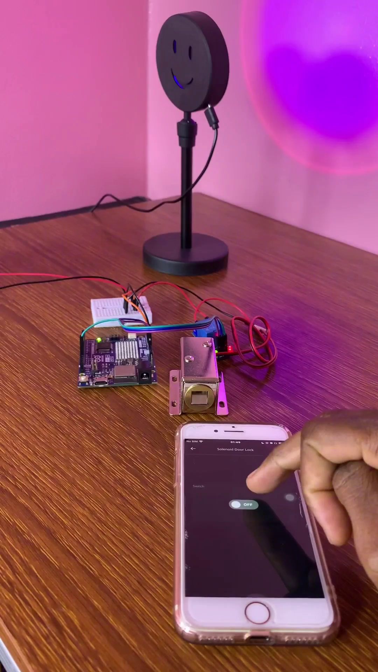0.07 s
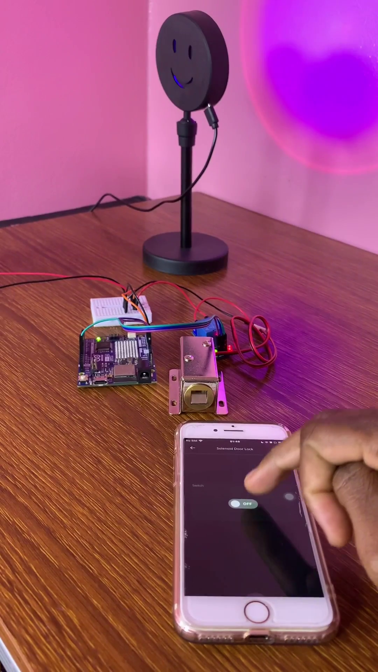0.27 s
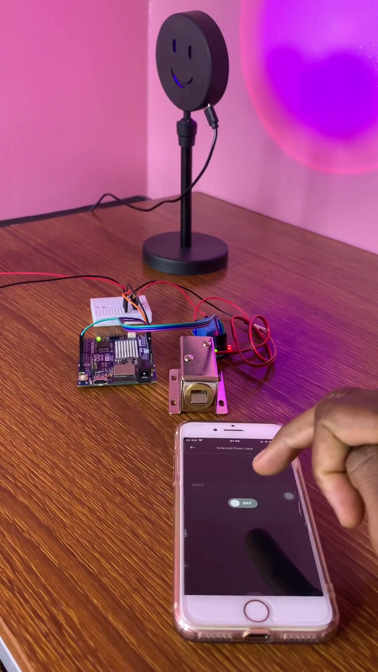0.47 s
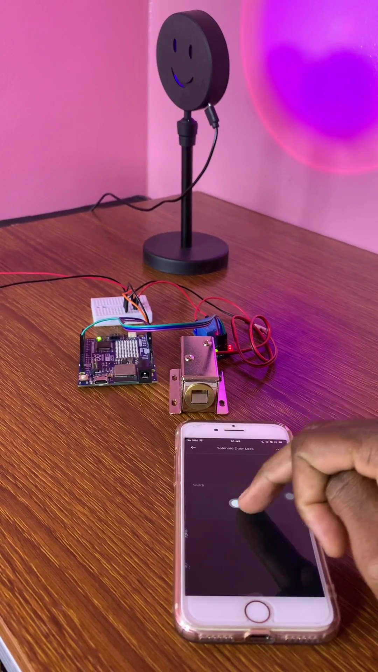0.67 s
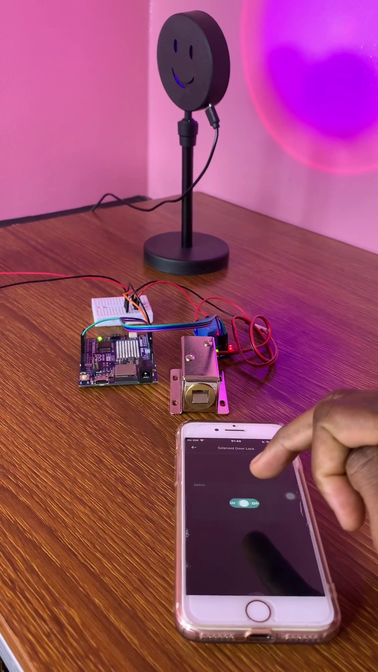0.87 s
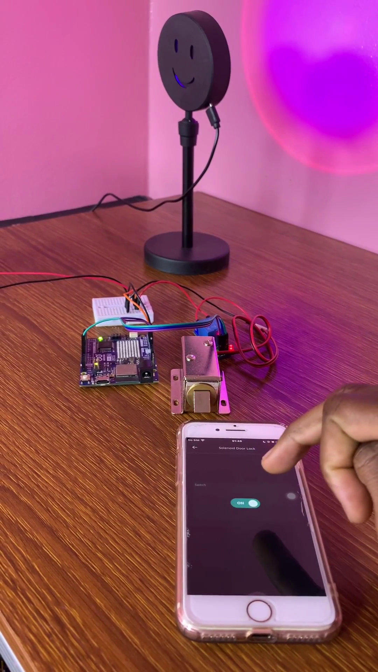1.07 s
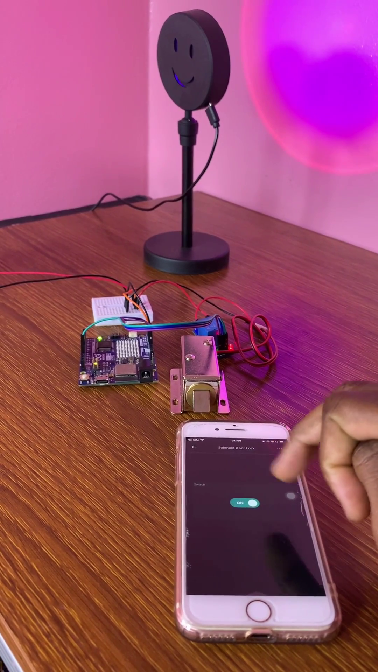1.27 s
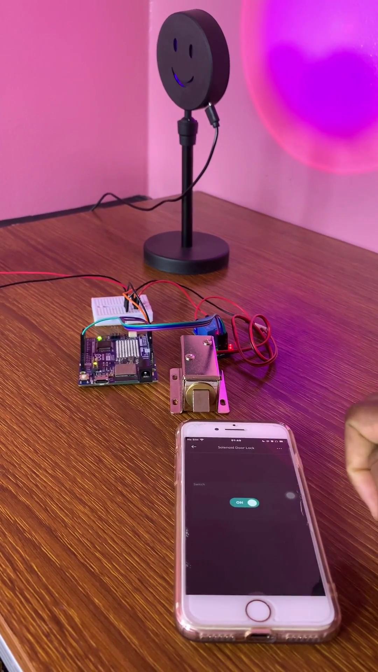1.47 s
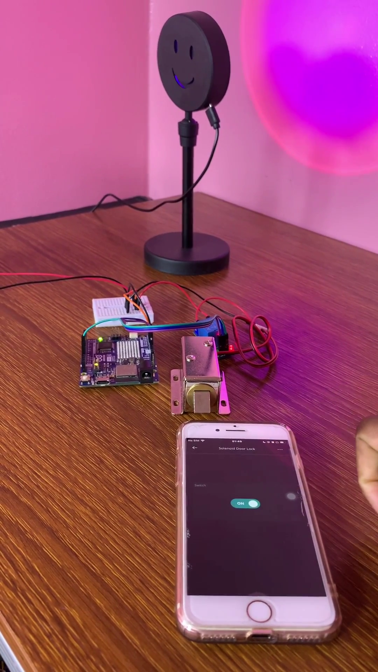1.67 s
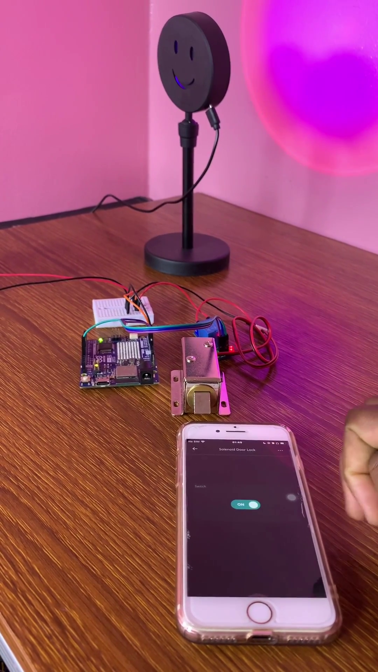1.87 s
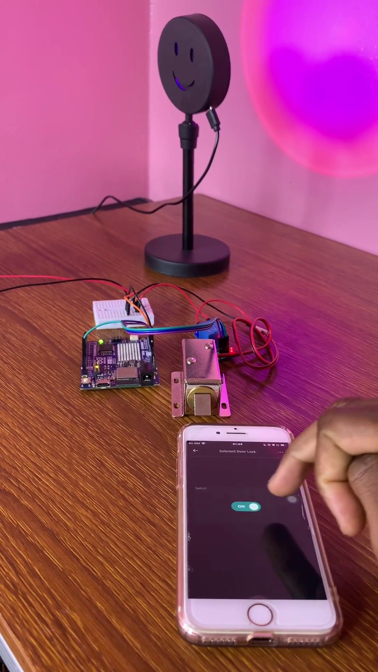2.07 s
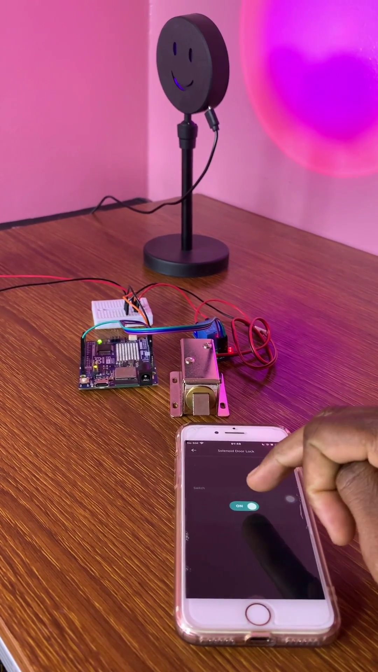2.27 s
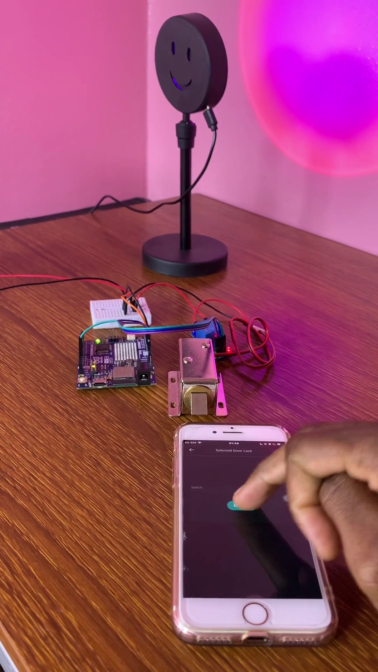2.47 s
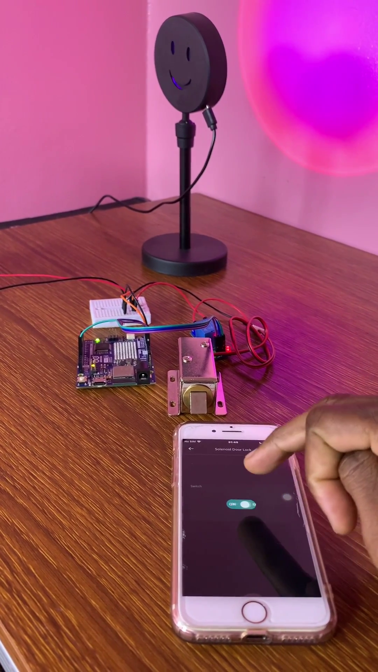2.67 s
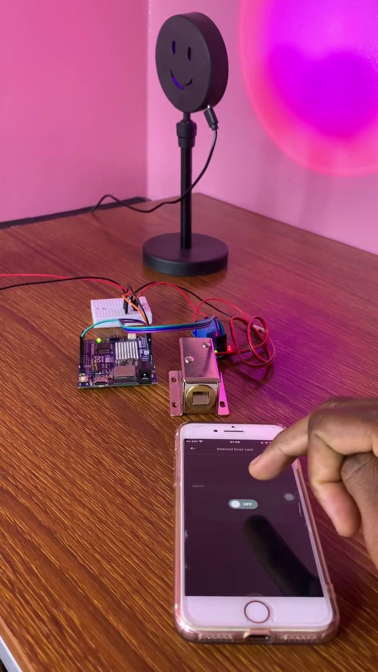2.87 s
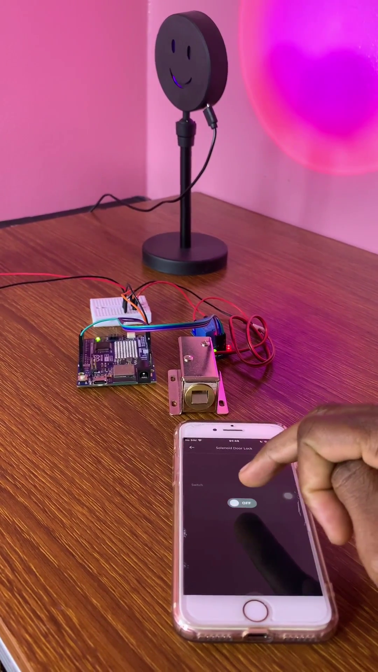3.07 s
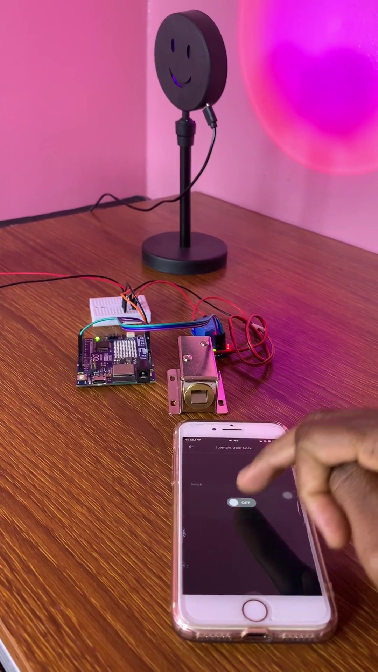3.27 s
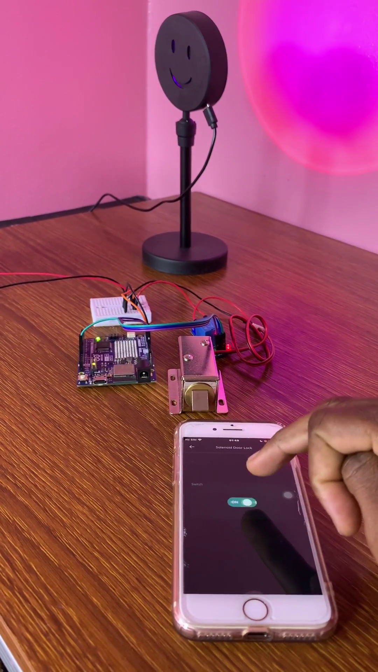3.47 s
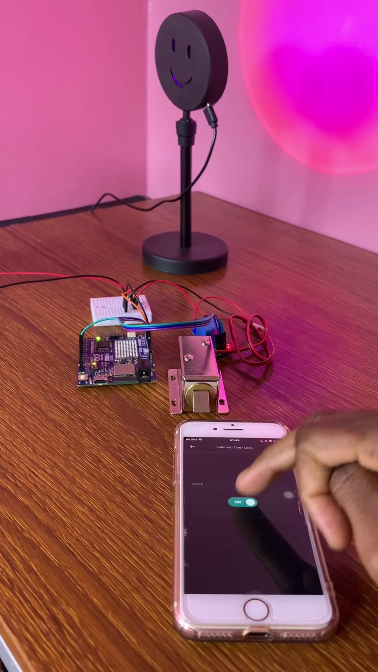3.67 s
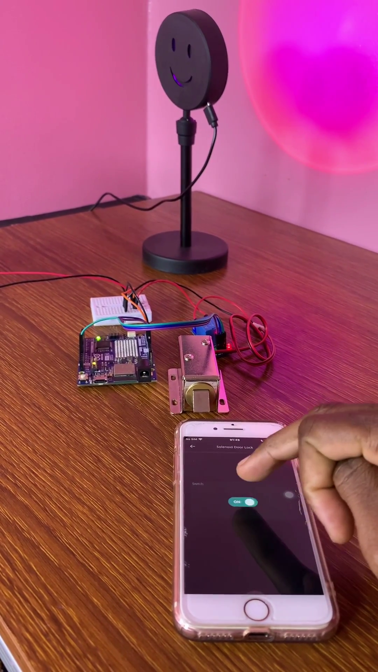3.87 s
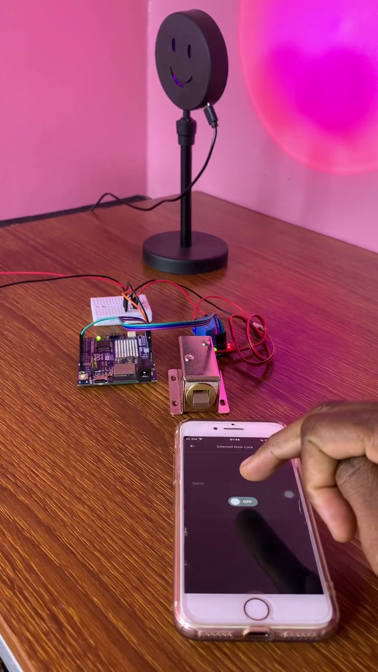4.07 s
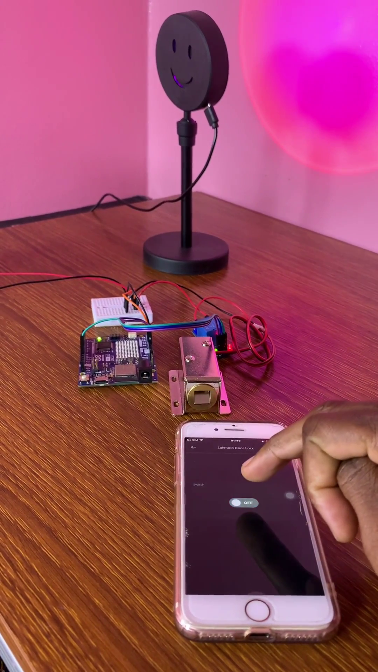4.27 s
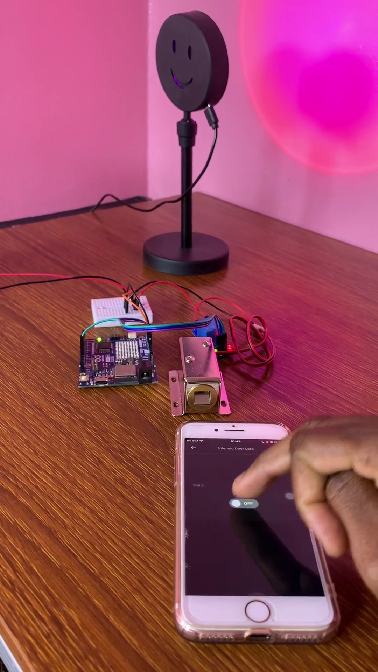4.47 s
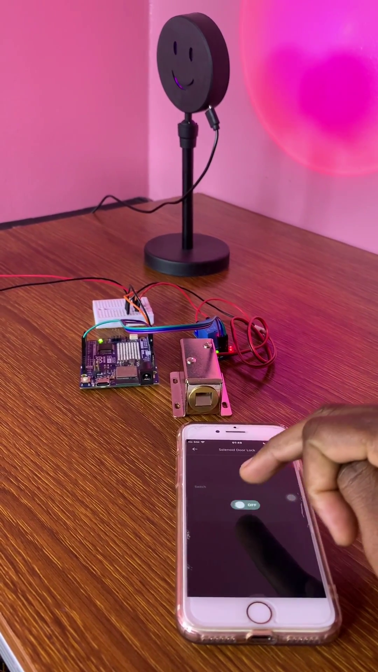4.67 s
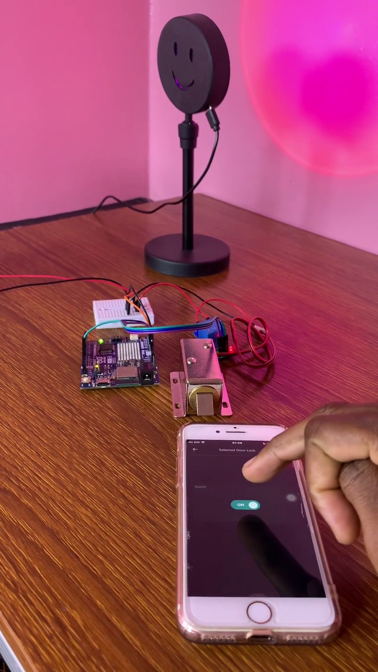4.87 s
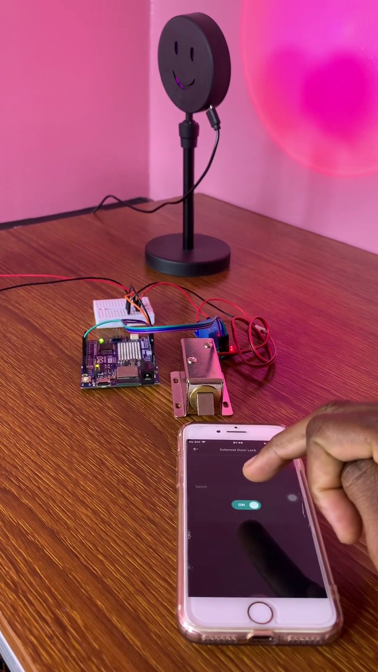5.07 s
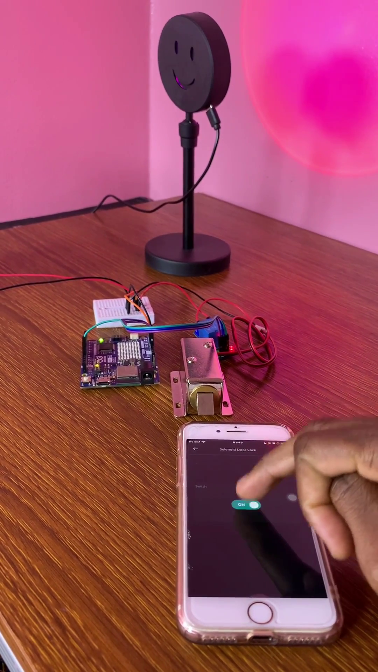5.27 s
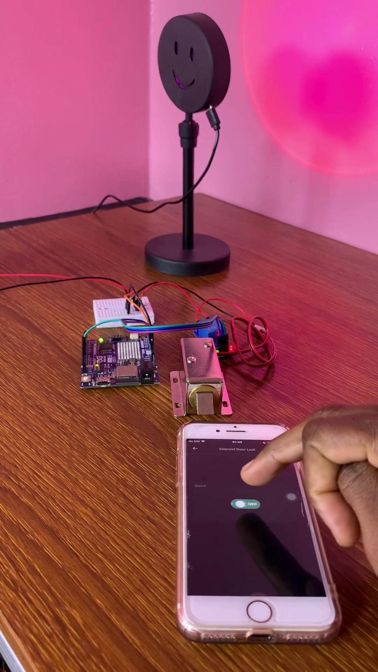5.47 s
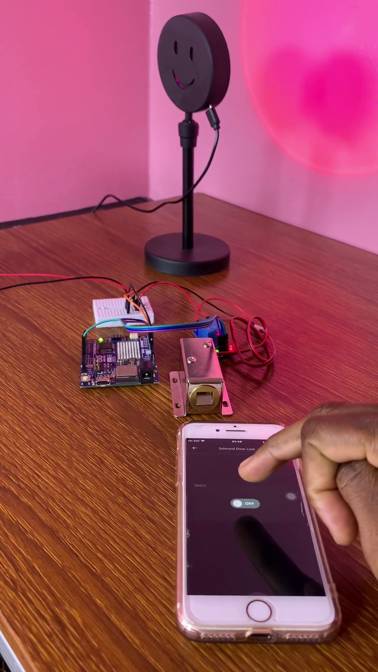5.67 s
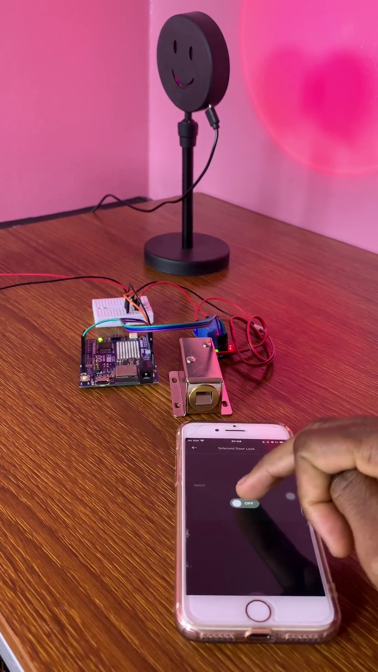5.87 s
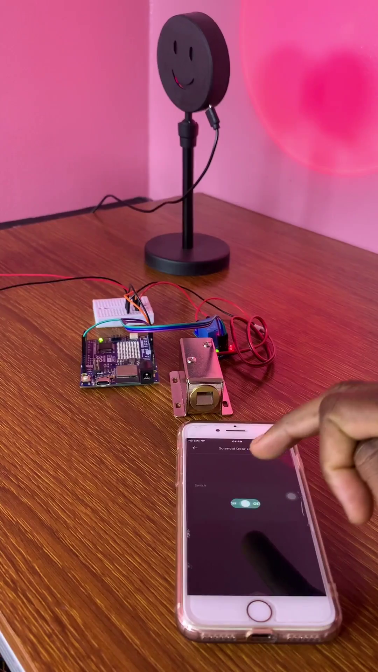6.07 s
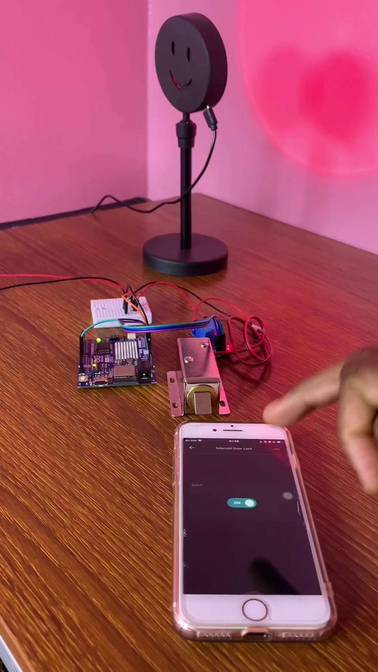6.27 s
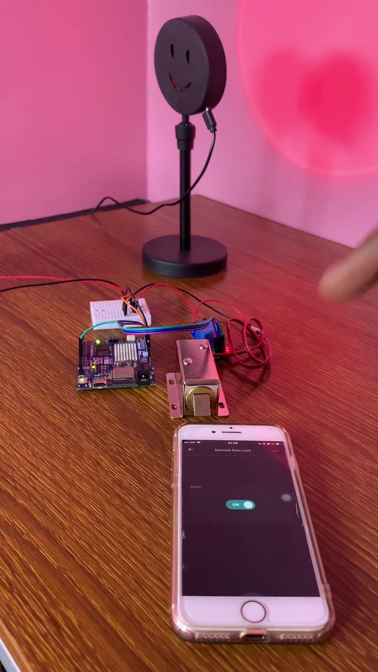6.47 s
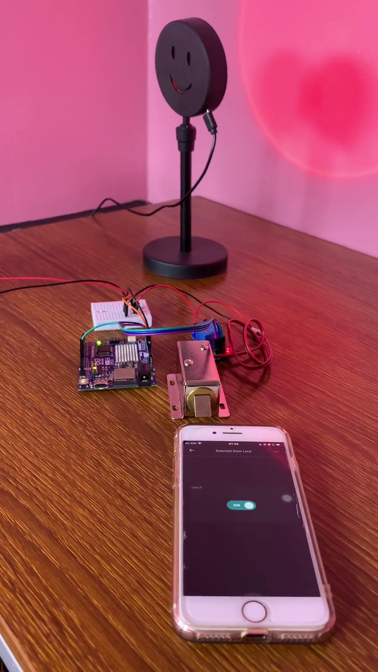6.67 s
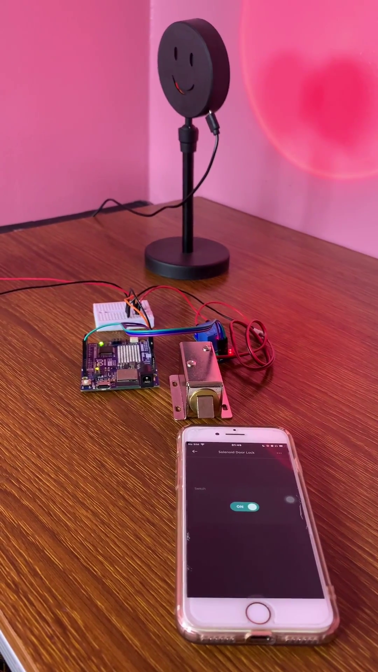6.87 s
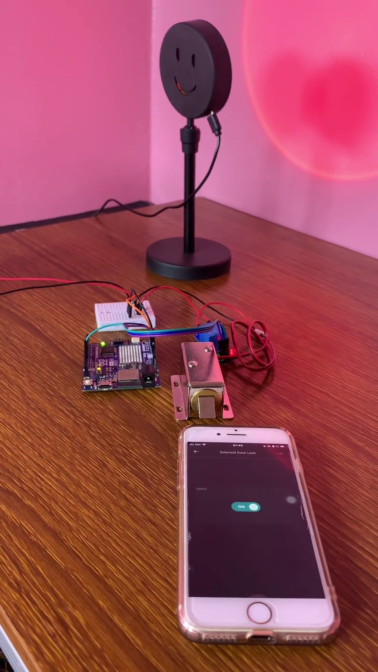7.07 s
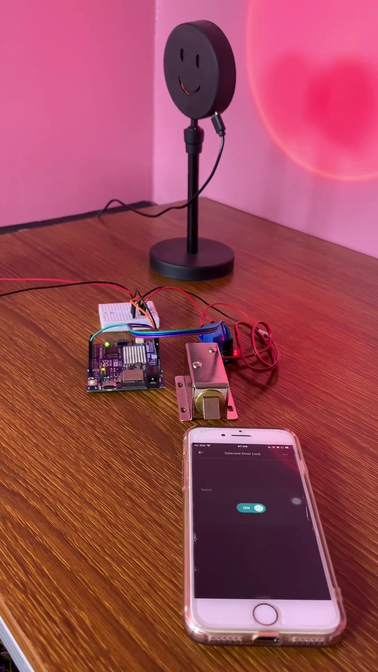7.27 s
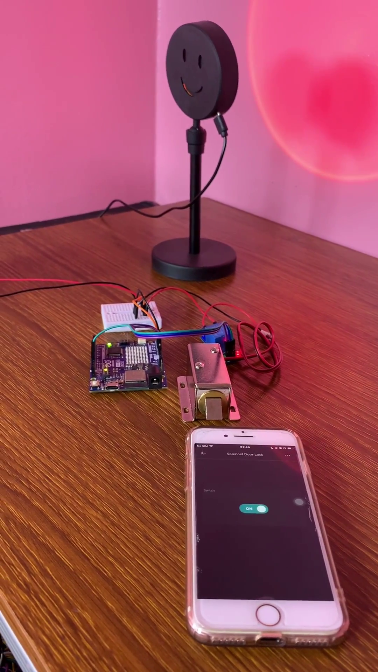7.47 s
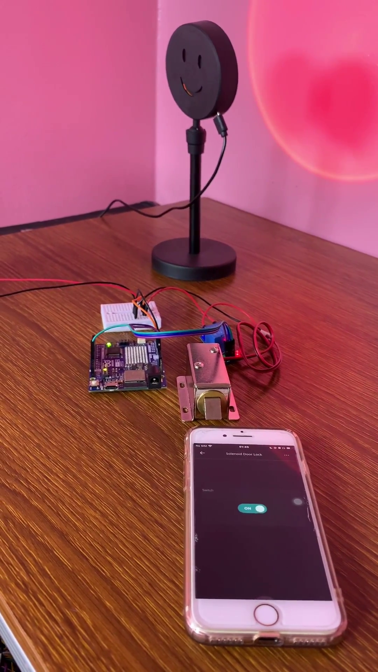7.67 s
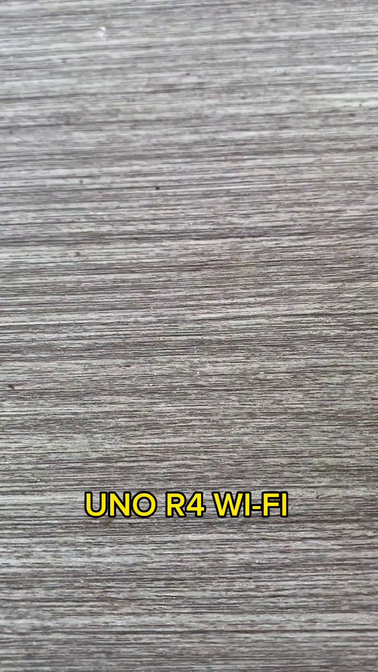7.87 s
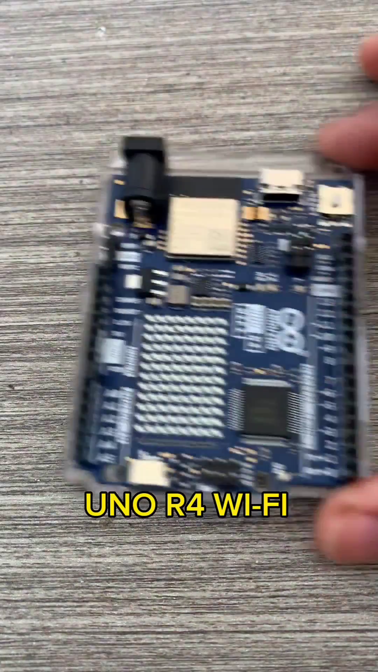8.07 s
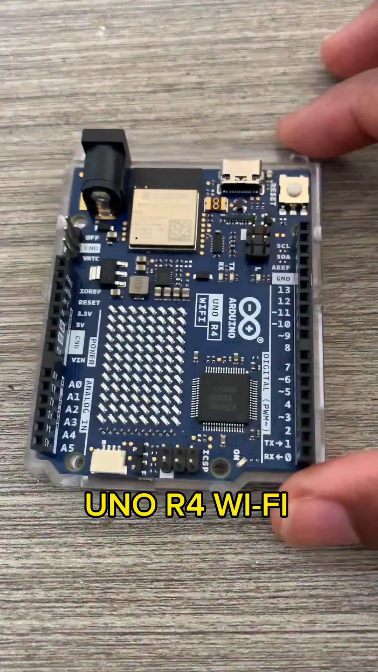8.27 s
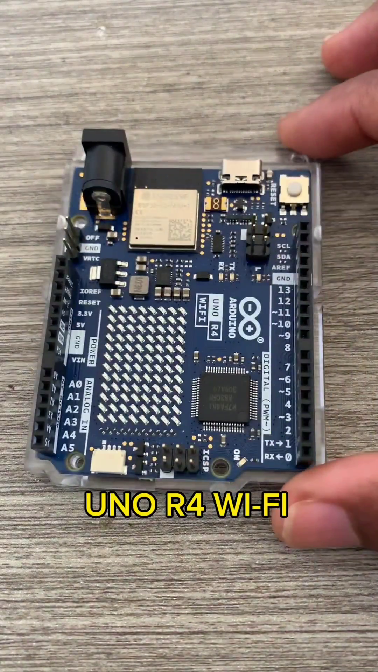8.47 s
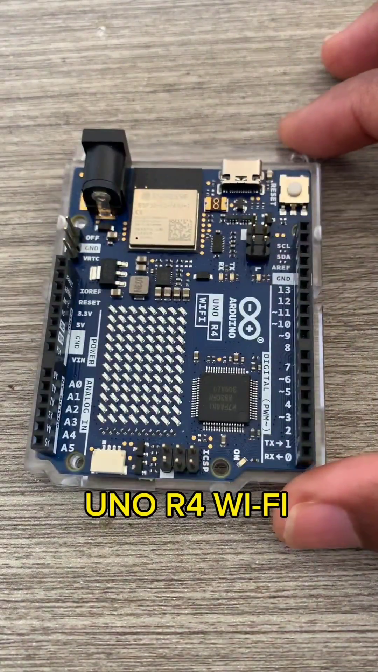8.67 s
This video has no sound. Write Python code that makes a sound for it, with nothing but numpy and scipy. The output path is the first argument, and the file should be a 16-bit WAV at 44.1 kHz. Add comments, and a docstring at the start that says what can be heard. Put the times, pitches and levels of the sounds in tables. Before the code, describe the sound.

Quiet hiss and low hum in a bare, reverberant room, heard close in stereo by a phone. A faint fingertip tap and soft bass thump come at 0.6 s. At 1.0 s a tiny relay tick leads into a loud, sharp metallic plunger slam with a short wooden desk boom and bright room tail. Faint taps follow at 1.8 and 2.5. At 2.75 the relay snaps, the bolt slides briefly and clacks out, its ring swelling slightly before fading. Slam in at 3.46, release at 4.08, slam at 4.79, release at 5.5, last slam at 6.13, decaying into near quiet. Around 7.75 a dull tap; at 7.87 the sound cuts to a dry mono tabletop: ticks, then a rough, hollow plastic tray scrape with woody rasp, strongest near 8.1, gone by about 8.3, with weak friction and thin clicks around 8.45 and 8.63.

```python
"""A solenoid lock on a wooden desk in a bare, ringing room, switched by a relay, close to a phone with two ports.
Pull-in: the relay ticks, the plunger slams home and shakes the desk. Release: the relay snaps, a spring throws
the bolt out. Strikes are enveloped noise and short pushes, coloured by filters, ringing modes and the room.
Behind them: hiss, hum, bass thumps and fingertip taps. At the end, in another place and in mono, a circuit
board in its plastic tray is slid over a table, made of filtered friction noise."""
import sys
import numpy as np
from scipy import signal
from scipy.fft import rfft, irfft
from scipy.io import wavfile
from scipy.ndimage import uniform_filter1d

SR = 44100
rng = np.random.default_rng(int(sys.argv[2]) if len(sys.argv) > 2 else 0)


def wav_out(sig):
    """Save sig, one row per channel (or a flat mono array), as 16-bit PCM at SR to the path in sys.argv[1]."""
    wavfile.write(sys.argv[1], SR, np.round(np.clip(np.atleast_2d(sig).T, -1, 1) * 32767).astype(np.int16))


N = 384463
T = np.arange(N) / SR
SIZE = 2 ** 15 * 13  # FFT length in samples
HZ = np.arange(SIZE // 2 + 1) * SR / SIZE
SECOND_PLACE_S = 7.862  # from here on: the table, in mono


def undb(db):
    """Amplitude factor of a level in dB."""
    return 10 ** (np.asarray(db) / 20)


def unit(x):
    """Scale to an RMS of 1."""
    return x / np.sqrt(np.mean(x ** 2))


def shape(x, gain):
    """Filter by a complex gain over frequency."""
    return irfft(rfft(x, SIZE) * gain, SIZE)[..., :N]


def colour(points):
    """Gain through (f/Hz, level/dB) points, straight on a log frequency axis."""
    hz, db = np.transpose(points)
    return undb(np.interp(np.log(HZ + 1), np.log(hz), db))


def bell(centre_hz, width_hz):
    """Gain with one rounded peak."""
    return 1 / (1 + ((HZ - centre_hz) / width_hz) ** 2)


def walk(size):
    """Slow random drift of RMS 1: noise averaged twice over size samples."""
    once = uniform_filter1d(rng.standard_normal(N), size=size)
    return unit(uniform_filter1d(once, size=size))


def grit(scatter_db):
    """Noise of micro-impacts with uneven sizes."""
    sizes = undb(scatter_db * rng.standard_normal(N))
    return unit(rng.standard_normal(N) * sizes)


def modes(table):
    """Summed response of decaying sines of alternating sign; each takes a cycle or two to build up."""
    t = np.arange(SR // 4) / SR
    ringing = np.zeros(len(t))
    for k, (hz, db, t60) in enumerate(table):
        build_up = 1 - np.exp(-t * hz / 1.7)
        ringing += (-1) ** k * undb(db - 60 * t / t60) * np.sin(2 * np.pi * hz * t) * build_up
    return rfft(ringing, SIZE)


def force(times, levels_db, contacts):
    """Envelope of contact force: every stroke plays the same short series of touches."""
    out, t = np.zeros(N), np.arange(SR // 10) / SR
    for s, db in zip(times, levels_db):
        for offset, part_db, rise, fall in contacts:
            i = int((s + offset) * SR)
            touch = np.minimum(t / rise, 1) ** 2 * np.exp(-np.maximum(t - rise, 0) / fall)
            out[i:i + len(t)] += undb(db + part_db) * touch
    return out


def knock(times, levels_db, push_s):
    """Short smooth pushes, each of unit area times its level."""
    out = np.zeros(N)
    out[(np.array(times) * SR).astype(int)] = undb(levels_db)
    t = np.arange(400) / SR
    push = t * np.exp(-t / push_s)
    return signal.fftconvolve(out, push / push.sum())[:N]


def ticks(table, low_hz, high_hz, fall_s):
    """Short bursts of band noise with the peak level of each row."""
    out, t = np.zeros(N), np.arange(1500) / SR
    band = signal.butter(3, [low_hz, high_hz], "band", fs=SR)
    for (s, db), noise in zip(table, rng.standard_normal((len(table), 1500))):
        tick = signal.lfilter(*band, noise * np.exp(-t / fall_s))
        out[int(s * SR):int(s * SR) + 1500] += undb(db) * tick / np.max(np.abs(tick))
    return out


# dull thumps in the bass as the hand presses and the lock strikes: t/s, level/dB
THUMP_TIMES = [(.645, -43), (1.02, -43.5), (2.1, -56), (2.479, -43.5), (2.76, -47.5), (2.97, -49.5),
               (3.2, -42.5), (3.47, -42), (4.28, -54), (4.549, -53), (4.821, -51), (5.2, -39), (5.8, -40.5),
               (6.14, -48), (6.38, -50), (7.7, -49.5), (7.87, -43), (8.2, -44), (8.42, -59)]
THUMP_RISE_S, THUMP_FALL_S = 0.06, 0.14


def thumps():
    """Envelope of the bass: each thump rises softly and dies away; overlaps add in power."""
    s, db = np.transpose(THUMP_TIMES)[:, :, None]
    t = np.maximum(T[::64] - s, 0)
    each = undb(db) * (1 - np.exp(-t / THUMP_RISE_S)) * np.exp(-t / THUMP_FALL_S)
    return np.repeat(np.sqrt(np.sum(each ** 2, axis=0)), 64)[:N]


# colour of the hiss in the air: f/Hz, relative density/dB per Hz
HISS_COLOUR = [(65, -18), (110, 2), (125, -15), (174, -5.5), (202, -11), (277, -5.5), (640, -20),
               (789, -20.5), (5100, -38.5), (10200, -38), (15200, -41.5), (16500, -42.5)]
HISS_DB, HISS_WAVER_DB = -65.5, 0.88
HUM_HZ, HUM_WIDTH_HZ, HUM_WAVER_DB = 56, 9, 3.5
ROOM_HUM_DB, TABLE_HUM_DB = -60.5, -64  # the hum at the first and second place
RUMBLE_HZ, RUMBLE_WIDTH_HZ = 75, 57


def air():
    """Quiet hiss that swells a little, a wavering hum and bass thumps, all noise; two unrelated copies."""
    noise = rng.standard_normal((3, 2, N))
    hiss_db = HISS_DB + HISS_WAVER_DB * walk(size=6000)
    hiss = unit(shape(noise[0], colour(HISS_COLOUR))) * undb(hiss_db)
    hum_db = np.where(T < SECOND_PLACE_S, ROOM_HUM_DB, TABLE_HUM_DB) + HUM_WAVER_DB * walk(size=5000)
    hum = unit(shape(noise[1], bell(HUM_HZ, HUM_WIDTH_HZ))) * undb(hum_db)
    rumble = unit(shape(noise[2], bell(RUMBLE_HZ, RUMBLE_WIDTH_HZ))) * thumps()
    return hiss + hum + rumble


# share of the air that is unrelated between the ports: f/Hz, level/dB
AIR_APART = [(60, -24), (300, -14), (1300, -5), (8000, -7)]


def air_at_ports(floor, other_floor):
    """Air comes from all around: a shared part, plus another with opposite sign at each port."""
    return floor + np.array([[1], [-1]]) * shape(other_floor, colour(AIR_APART))


# ringing of the bare room, band by band: f/Hz, t60/s, level/dB
ROOM_BANDS = [(90, .8, -18), (180, 0.86, -9), (377, 0.81, -16), (730, 0.75, -7.5), (1280, .9, -15),
              (2800, 0.92, -12.5), (4500, 0.94, -19.5), (5450, 0.84, -19), (6800, 0.69, -16.5),
              (10500, 0.52, -16), (12500, .42, -13.5), (15000, 0.29, -11), (16500, .3, -19.5)]


def room():
    """Response of the room: noise that dies away band by band, starting with the nearest wall."""
    t, centres = np.arange(SR) / SR, np.log(np.array(ROOM_BANDS)[:, 0])
    out = 0
    noise = rng.standard_normal(SR) * np.clip((t - 0.006) / 0.0036, 0, 1)
    for k, (_, t60, db) in enumerate(ROOM_BANDS):
        band = np.interp(np.log(np.arange(SR + 1) / 2 + 1), centres, np.arange(len(ROOM_BANDS)) == k)
        out = out + band * rfft(noise * undb(db - 60 * t / t60), 2 * SR)
    return rfft(irfft(out)[:SR], SIZE) * undb(-24.0)


# fingertip on glass and small ticks of the desk: t/s, level/dB
TAP_TIMES = [(0.631, -54), (1.755, -56), (2.474, -56.5), (5.295, -66), (7.751, -52.5), (7.868, -47),
             (8.634, -66)]
# thin treble ticks: t/s, level/dB
TICK_TIMES = [(5.2, -62), (5.324, -59), (7.867, -49), (7.882, -53), (8.456, -56), (8.4623, -47.5),
              (8.6364, -65)]
TAP_HZ, TAP_FALL_S, TAP_DESK_DB = 950, 0.0045, -7
TICK_HZ, TICK_FALL_S = 10960, 0.001


def taps(desk):
    """Each touch is a dull tick and a thud through the desk; thin ticks sit on top."""
    s, db = np.transpose(TAP_TIMES)
    dull = ticks(TAP_TIMES, TAP_HZ / 2, TAP_HZ * np.sqrt(2), TAP_FALL_S)
    thud = shape(knock(s, db + TAP_DESK_DB, push_s=0.0026), desk)
    thin = ticks(TICK_TIMES, 0.86 * TICK_HZ, 1.3 * TICK_HZ, TICK_FALL_S)
    return dull + thud + thin


# tray dragged over the table: t/s, table top level/dB, tray level/dB
SLIDE_LEVELS = [(7.86, -68, -72), (7.88, -41.5, -49), (7.92, -33, -42), (7.98, -40.5, -34.5),
                (8.066, -34.5, -29.5), (8.122, -32, -32), (8.23, -38, -43.5), (8.308, -54, -56.5),
                (8.434, -44, -60.5), (8.512, -51, -66), (8.668, -56.5, -66), (8.718, -84, -65)]
# colour of the table top: f/Hz, level/dB
TABLE_TOP_COLOUR = [(60, -50), (110, -16), (150, 3.5), (200, 7), (260, -2.5), (330, -6.5), (450, -29),
                    (900, -77)]
# colour of the hollow plastic tray: f/Hz, level/dB
TRAY_COLOUR = [(200, -43), (330, -15.5), (480, 9), (540, 8.5), (620, 1), (720, 1), (850, -45), (1500, -52),
               (4000, -84)]
# colour of the rasping wood grain: f/Hz, level/dB
RASP_COLOUR = [(500, -14), (800, 4.5), (1000, 8), (1150, -3.5), (1300, 4), (1600, -1.5), (2000, -1.5),
               (2900, -15.5), (3700, -10), (4400, -17), (5100, -24.5), (5900, -14), (6500, -24.5),
               (7000, -23), (7500, -62), (12000, -89.5)]
RASP_DB, RASP_SLOPE, RASP_FROM_DB = -36, 1.29, -29.5  # the rasp grows faster than the tray's drone


def tray():
    """Rough friction shakes the table top and the hollow tray; the grain of the wood rasps."""
    rub = grit(2.0) * undb(1.3 * walk(size=500))
    s, *levels = np.transpose(SLIDE_LEVELS)
    top_db, tray_db = [np.interp(T, s, level) for level in levels]
    rasp_db = RASP_DB + RASP_SLOPE * (tray_db - RASP_FROM_DB)
    top = unit(shape(rub, colour(TABLE_TOP_COLOUR))) * undb(top_db)
    drone = unit(shape(rub, colour(TRAY_COLOUR))) * undb(tray_db)
    rasp = unit(shape(rub, colour(RASP_COLOUR))) * undb(rasp_db)
    return (T > SECOND_PLACE_S) * (top + drone + rasp)


# ringing of the wooden desk: f/Hz, level/dB, t60/s
DESK_RINGING = [(107, -15.5, 0.6), (168.75, 1, 0.16), (241.4, -0.5, 0.16), (276, -2, .12),
                (320, -2.5, 0.072), (369, 0, .1), (439, 3, 0.053), (484, -5.5, .08), (540, -1, .06),
                (664.5, -8, .05), (1064, 1, 0.04), (1180, -5, 0.06), (1553, 6.5, .03), (1958, 16.5, 0.016),
                (2116, 2.5, 0.027)]


def desk_response():
    """The desk top booms in low, damped modes."""
    return modes(DESK_RINGING)


# ringing of the steel bolt: f/Hz, level/dB, t60/s
BOLT_RINGING = [(2290, -31.5, 0.0065), (3829, -24.5, 0.0075), (4377, -27, 0.016), (5040, -22, .007),
                (8410, -28, 0.0066), (9960, -32.5, .005), (15500, -25, .006)]


def steel_response():
    """The bolt rings in high modes that die within milliseconds."""
    return modes(BOLT_RINGING)


# colour of the relay: f/Hz, level/dB
RELAY_COLOUR = [(300, -19.5), (3000, -27.5), (5000, -11.5), (7000, -14), (8400, -3), (10500, 0),
                (13000, -5.5), (15500, 0)]


def relay(times, levels_db, contacts, impacts):
    """Small contacts strike and bounce: bursts of micro-impacts in the relay's bright colour."""
    return shape(force(times, levels_db, contacts) * impacts, colour(RELAY_COLOUR))


# bolt thrown out: t/s, level/dB, swell of the ring/dB
RELEASE_STROKES = [(2.7455, -12, 13), (4.0806, -10.5, 10.5), (5.5098, -13, 13.5)]
RELAY_LEADS_S = 0.0236  # the releasing relay comes before the bolt
SWELL_S, SWELL_BEND = 0.22, 2.5


def swell():
    """After a release the ring holds up and swells a little before it dies away."""
    db = np.zeros(N)
    for s, _, swell_db in RELEASE_STROKES:
        climb = np.clip((T - s) / SWELL_S, 0, 1) ** SWELL_BEND
        db = np.where(T > s - RELAY_LEADS_S, swell_db * climb, db)
    return undb(db)


# contacts of the relay in one release: offset t/s, level/dB, rise/s, fall/s
RELEASE_RELAY_CONTACTS = [(.001, 2.5, 0.0008, 0.0015), (.003, -0.5, .0008, 0.0018)]
# the bolt sliding: offset t/s, level/dB, rise/s, fall/s
RELEASE_SLIDE_CONTACTS = [(-0.02, 1, 0.019, 0.0037)]
# the bolt at its stop: offset t/s, level/dB, rise/s, fall/s
RELEASE_BOLT_CONTACTS = [(.0008, 0, 0.00064, 0.0018), (.004, -1, .001, 0.003), (.008, -7.5, 0.0017, .0015)]
# colour of the sliding bolt: f/Hz, level/dB
SLIDING_COLOUR = [(1500, -13), (3800, 1), (5200, -0.5), (7500, -5.5), (16000, -14)]
# colour of the bolt at its stop: f/Hz, level/dB
BOLT_OUT_COLOUR = [(300, -17), (1000, -13), (1700, -14), (2400, -3), (3900, -3), (5100, 1), (6600, 0.5),
                   (10000, 1.5), (13000, 1.5), (15300, -2.5)]
RELEASE_DESK_DB = -24.5


def releases(desk, steel, impacts):
    """The relay snaps, the bolt sings as it slides, then hits its stop and bounces."""
    s, db, _ = np.transpose(RELEASE_STROKES)
    snap = relay(s - RELAY_LEADS_S, db, RELEASE_RELAY_CONTACTS, impacts)
    slide = shape(force(s, db, RELEASE_SLIDE_CONTACTS) * impacts, steel * colour(SLIDING_COLOUR))
    stop = shape(force(s, db, RELEASE_BOLT_CONTACTS) * impacts, colour(BOLT_OUT_COLOUR) + steel)
    boom = shape(knock(s + 0.0045, db + RELEASE_DESK_DB, push_s=0.00028), desk)
    return snap + slide + stop + boom


# plunger slams: t/s, level/dB
PULL_STROKES = [(1.0046, -5.5), (3.463, -4.5), (4.7928, -6.5), (6.1288, -6.5)]
# contacts of the relay in one pull-in: offset t/s, level/dB, rise/s, fall/s
PULL_RELAY_CONTACTS = [(-.0215, -26, .001, .002), (-.0195, -21, .0005, 0.0039)]
# contacts of the plunger: offset t/s, level/dB, rise/s, fall/s
PULL_BOLT_CONTACTS = [(-.0155, -13, .002, 0.011), (-.002, -11.5, 0.0015, .001), (.001, 2, 0.00049, 0.0022),
                      (.0038, 6, .0004, 0.0011), (.007, -7, .0005, 0.0045), (0.0225, -6.5, 0.002, 0.0031)]
# colour of the slamming plunger: f/Hz, level/dB
BOLT_COLOUR = [(300, -11), (1000, -13.5), (1900, -9), (2700, -14), (3600, -2.5), (4600, 4), (5600, -7),
               (6600, -10.5), (10000, -4.5), (13000, -6), (15300, -10)]
PULL_DESK_DB, PULL_RING_DB = -20, -14.5


def pulls(desk, steel, impacts):
    """The relay ticks, the plunger starts, slams, bounces; the desk booms."""
    s, db = np.transpose(PULL_STROKES)
    tick = relay(s, db, PULL_RELAY_CONTACTS, impacts)
    first_blow = knock(s + 0.001, db + PULL_DESK_DB, push_s=0.00006)
    second_blow = knock(s + 0.032, db + PULL_DESK_DB - 6.5, push_s=0.00047)
    boom = shape(first_blow + second_blow, desk)
    plunger_gain = colour(BOLT_COLOUR) + undb(PULL_RING_DB) * steel
    return tick + boom + shape(force(s, db, PULL_BOLT_CONTACTS) * impacts, plunger_gain)


def scatter():
    """The phone's own body and the desk top scatter the sound differently to each port."""
    t = np.arange(300) / SR
    echo = rng.standard_normal(300) * np.exp(-t / 0.001)
    return rfft(echo / np.sqrt(np.sum(echo ** 2)), SIZE)


# left microphone port against right: f/Hz, lead/rad, louder by/dB
PORT_DIFFERENCE = [(0, -1.5, 1.5), (125, 0.25, -0.2), (250, 0.1, 2.4), (500, 1.2, -0.44), (860, 0.72, -2),
                   (1220, 1.27, 0), (1700, 0.6, -1.5), (3888, 2, 0.6), (5176, 4, 1.5), (8680, 9, -1.5),
                   (13550, 17.5, 1.5), (17000, 22, -2.5)]
# share of the unrelated sound at the ports: f/Hz, level/dB
LOCK_APART = [(60, -28), (300, -14), (700, -9), (2500, -8), (5000, -12), (16000, -15)]


def ports(x, other):
    """Both ports hear the same sound at a lag that changes with pitch, plus a share that is unrelated."""
    hz, ahead, louder_db = np.transpose(PORT_DIFFERENCE)
    # half the difference goes to each port
    half_turn = np.exp(0.5j * np.interp(HZ, hz, ahead))
    left = half_turn * undb(np.interp(HZ, hz, louder_db) / 2)
    apart = shape(other, colour(LOCK_APART))
    return shape(x, np.array([left, 1 / left])) + np.array([apart, -apart])


def scene():
    """The lock in its room at two ports, then the tray on the table in mono."""
    desk, steel, impacts = desk_response(), steel_response(), grit(2.2)
    pull, release, touch = pulls(desk, steel, impacts), releases(desk, steel, impacts), taps(desk)
    rooms = np.array([room(), room()])
    ring, other_ring = shape(pull + touch, rooms) + swell() * shape(release, rooms)
    floor, other_floor = air()
    scattered = shape(pull + release, scatter())
    pair = ports(pull + release + touch + ring, other_ring + scattered)
    pair = pair + air_at_ports(floor, other_floor)
    return np.where(T < SECOND_PLACE_S, pair, floor + touch + tray())


def record(dry):
    """The phone drops the deep bass, rounds the loudest peaks and cuts the top."""
    bass_cut = signal.butter(2, 43, "high", fs=SR, output="sos")  # Hz
    top_cut = signal.ellip(10, 0.2, 90, 16050, fs=SR, output="sos")  # ripple dB, stop dB, Hz
    thin = signal.sosfilt(bass_cut, dry)
    return signal.sosfilt(top_cut, np.tanh(thin))


dry = scene()
out = record(dry)
wav_out(out)
```